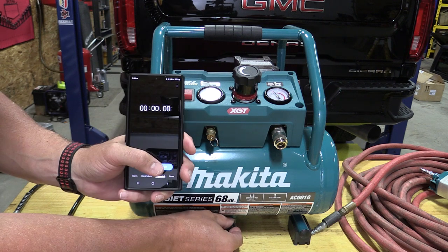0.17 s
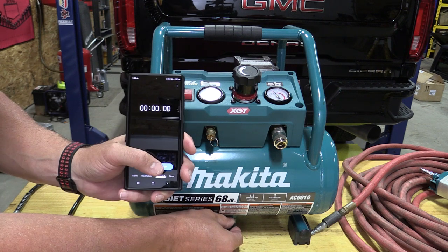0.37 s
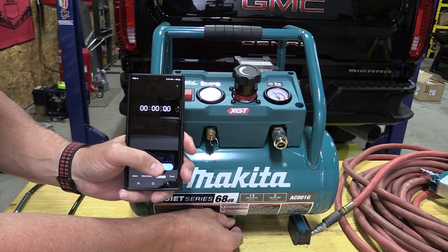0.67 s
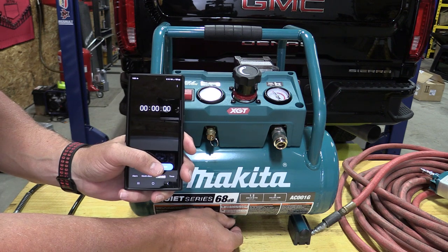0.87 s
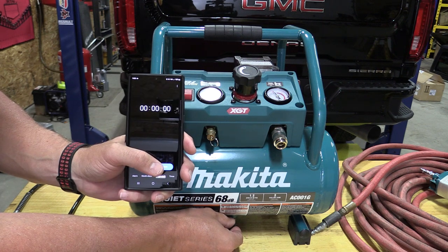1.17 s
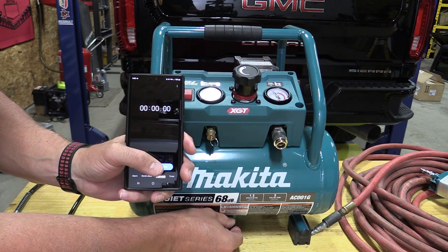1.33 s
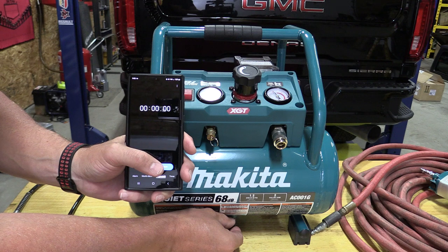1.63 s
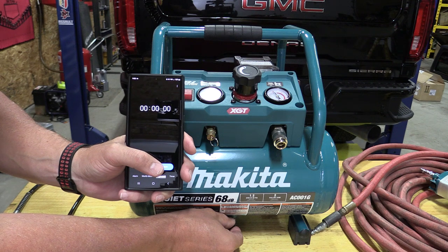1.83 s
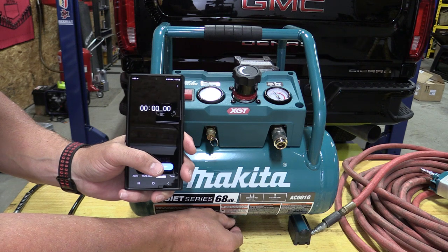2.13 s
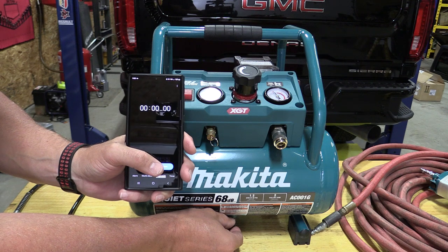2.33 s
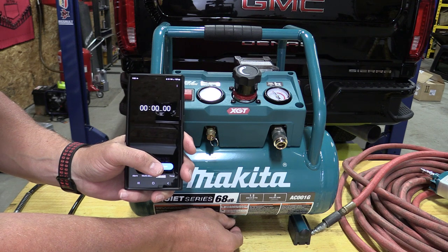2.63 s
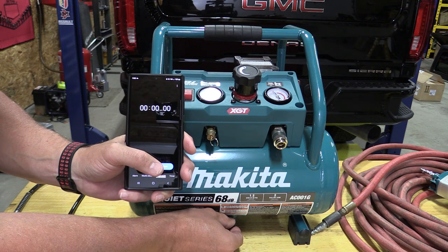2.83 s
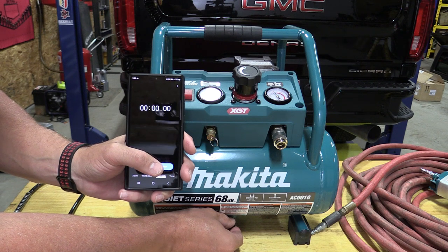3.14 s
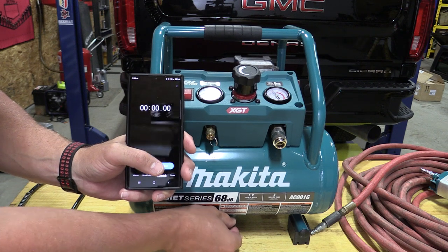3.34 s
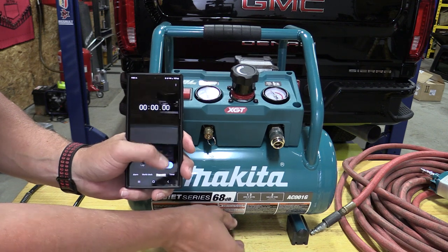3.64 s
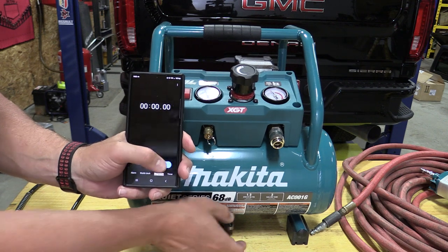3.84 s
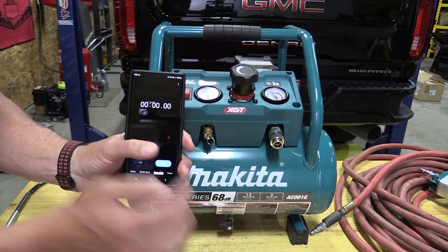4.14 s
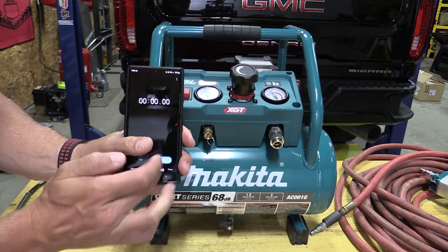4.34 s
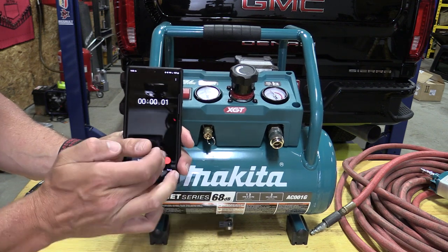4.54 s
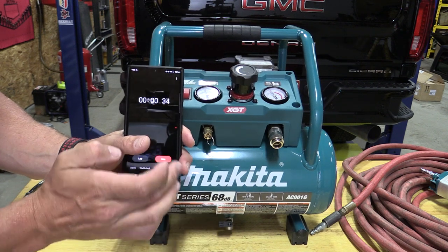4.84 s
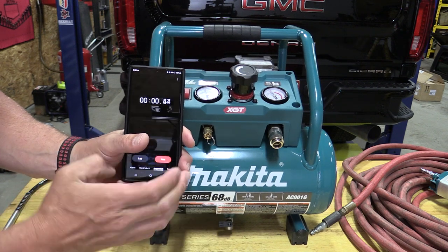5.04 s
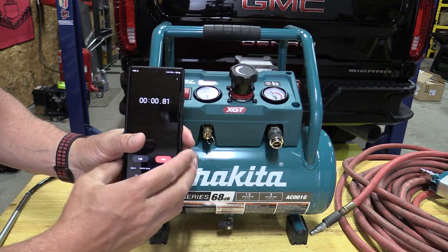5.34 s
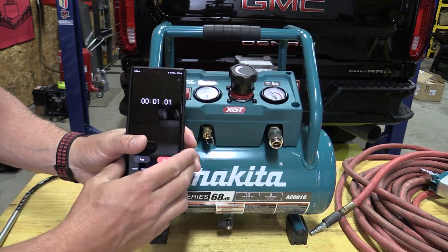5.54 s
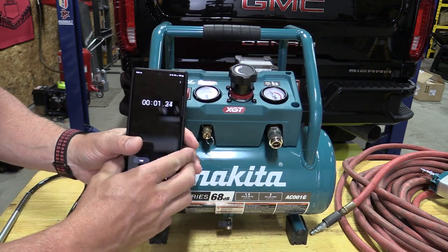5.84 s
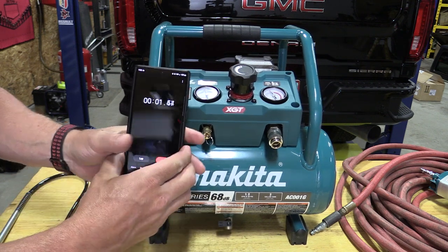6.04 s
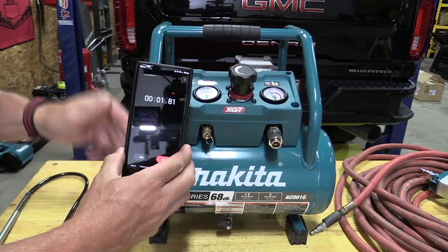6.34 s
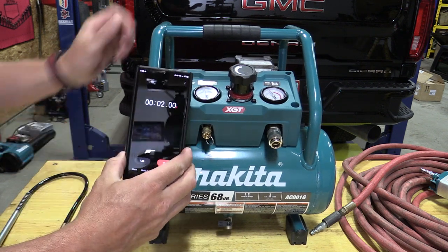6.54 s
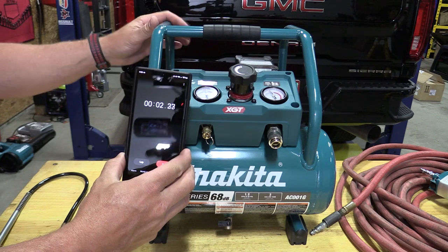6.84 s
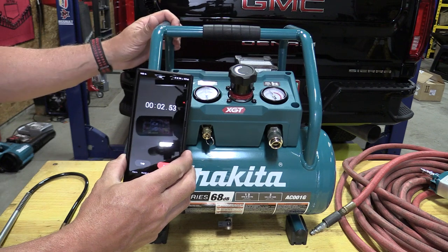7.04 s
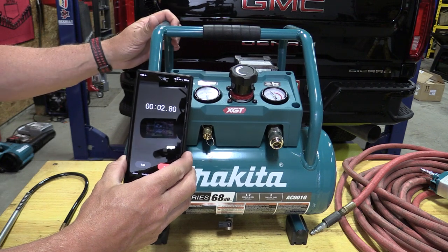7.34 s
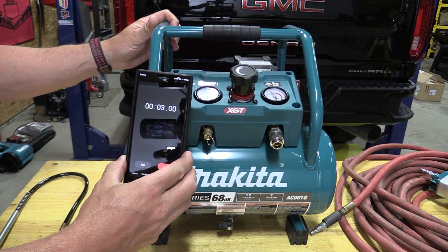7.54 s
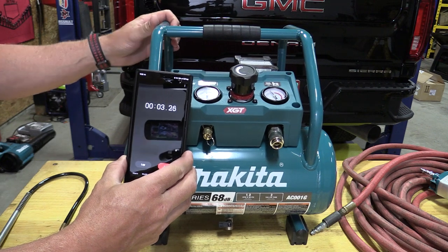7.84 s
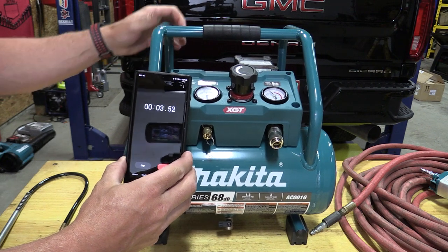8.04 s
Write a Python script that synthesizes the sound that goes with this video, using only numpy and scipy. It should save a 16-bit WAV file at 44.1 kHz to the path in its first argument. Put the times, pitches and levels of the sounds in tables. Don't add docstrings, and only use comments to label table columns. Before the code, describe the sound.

A tank drain cock is opened almost at once and sprays bright, flickering air for about three seconds, with sparse metallic ticks from its lever. The motor jerks in with dull knocks, the hiss is shut off abruptly, and a small pump runs on with a steady buzzing whine, rattling covers and rapid valve clicks. Close microphone, hard-walled workshop with bright short echoes.

```python
import sys
import numpy as np
from scipy import signal
from scipy.io import wavfile
from scipy.ndimage import uniform_filter1d

SR = 44100
rng = np.random.default_rng(int(sys.argv[2]) if len(sys.argv) > 2 else 0)


def wrap_up_sound(samples):
    columns = np.atleast_2d(samples).T
    tamed = np.clip(columns, -1, 1)
    steps = np.round(tamed * 32767).astype(np.int16)
    wavfile.write(sys.argv[1], SR, steps)


def field_ratio(decibels):
    return 10 ** (np.asarray(decibels, dtype=float) / 20)


N = 361619
SLOW = np.arange(0, N / SR + .02, .01)
POLES = 28
STARTS_S = 3.19


def evened(x):
    return x / np.sqrt(np.mean(x ** 2) + 1e-20)


def read(points, hz):
    f, value = np.transpose(points)
    return np.interp(np.log(hz + 1), np.log(f + 1), value)


def add(mix, s, sound):
    part = mix[round(s * SR):][:len(sound)]
    part += sound[:len(part)]


def spectra_grid(size):
    return np.fft.rfftfreq(size, 1 / SR)[:, None], np.arange(4 * N // size + 5) * size / 4 / SR


def noise(gain, size):
    a, b = rng.standard_normal((gain.shape[1], gain.shape[0], 2)).T
    return signal.istft((a + 1j * b) * gain, nperseg=size, noverlap=size * 3 // 4)[1][:N]


def colour(x, points):
    log_gain = np.log(field_ratio(read(points, abs(np.fft.fftfreq(8192, 1 / SR)))))
    taps = np.fft.ifft(np.exp(signal.hilbert(log_gain).conj())).real[:2048]
    return signal.oaconvolve(x, taps)[:N]


def drift(rate, count=20):
    return evened(sum(np.sin(2 * np.pi * (f * SLOW + rng.random())) for f in rate * np.geomspace(.1, 1, count)))


def ramp(t, start, end):
    return np.clip((t - start) / (end - start), 0, 1)


def hold(t, start, full, easing, end):
    return ramp(t, start, full) - ramp(t, easing, end)


# (frequency [Hz], level [dB per Hz])
ROOM_TONE = [(8.8, -32), (15, 0), (40, 4), (50, 0), (65, -4.5), (107, -10), (173, -15), (400, -18),
             (520, -23), (880, -120)]


def room_tone():
    hz, t = spectra_grid(size=4096)
    return field_ratio(-53) * evened(noise(field_ratio(read(ROOM_TONE, hz)) * np.ones(len(t)), size=4096))


def cock_state(t):
    opens_s, open_rise_s, settle_s = .085, .01, .25
    pinch_s, shuts_s, shut_fall_s = 3.2, 3.372, .006
    leak_db, flow_db, burst_db, pinch_db, shut_db = -30, -23.5, 1.3, -1.8, -48
    leak_opening, flow_opening, pinch_opening = .07, .92, .72
    opened, pinched = ramp(t, opens_s, opens_s + open_rise_s), ramp(t, pinch_s, shuts_s)
    fresh = np.exp(-np.maximum(t - opens_s, 0) / settle_s)
    db = leak_db + opened * (flow_db + burst_db * fresh - leak_db) + pinch_db * pinched ** 2
    db = db + shut_db * ramp(t, shuts_s, shuts_s + shut_fall_s)
    wide = flow_opening + (1 - flow_opening) * fresh + pinched * (pinch_opening - flow_opening)
    return db, leak_opening + opened * (wide - leak_opening)


# (frequency [Hz], level [dB per Hz])
JET_OPEN = [(88, -56), (150, -23.5), (327, -19.5), (802, -13), (1280, -21.5), (2390, -17), (3970, -7),
            (5630, -14.5), (8320, 1.5), (10700, -3), (12800, -17), (13600, 4.5), (14170, -9), (14700, 0),
            (15800, -9.5)]
# (frequency [Hz], level [dB per Hz])
JET_NARROW = [(290, -77), (500, -45), (578, -8), (728, -20), (1020, -11.5), (1680, -9), (1840, -10),
              (2120, -13.5), (3090, -18), (4070, -7.5), (6100, -12.5), (7570, -1), (9300, -2), (10000, -10),
              (11000, -1), (12400, -5), (13300, -22), (14800, -11), (15800, -20)]
# (frequency [Hz], width [Hz], level [dB])
GAP = [(1966, 310, -17), (2544, 110, -23), (3294, 270, -10), (3720, 520, -8), (3990, 370, -9.5),
       (4720, 430, -8.5), (5180, 400, -11.5), (6460, 170, -10), (7050, 210, -10.5), (7280, 100, 1.5),
       (7800, 170, 0), (8330, 180, -5.5), (8310, 190, 1), (9000, 120, -23), (9290, 120, -22),
       (9790, 200, 4), (10330, 230, 1), (10980, 310, 1), (11700, 360, -6.5), (12200, 260, -9),
       (12750, 150, -13), (13400, 220, 1), (13850, 320, 0), (14550, 350, -9), (15000, 250, -12),
       (15400, 200, -9)]


def jet():
    hz, t = spectra_grid(size=512)
    opening = np.clip(cock_state(t)[1], 0, 1)
    humps = sum(field_ratio(2 * db) / (1 + (2 * (hz - f) / w) ** 4) for f, w, db in GAP)
    wide = np.sqrt(humps + field_ratio(2 * (read(JET_OPEN, hz) - 4.5)))
    narrow = field_ratio(read(JET_NARROW, hz))
    patches = rng.standard_normal((len(t), len(hz))).T
    patches = evened(uniform_filter1d(uniform_filter1d(patches, 9, 0), 7, 1))
    flicker_db = 1.0 * patches + 0.35 * rng.standard_normal(len(t))
    shape = opening * evened(wide) + (1 - opening) * evened(narrow)
    air = noise(shape * field_ratio(flicker_db), size=512)
    return field_ratio(cock_state(np.arange(N) / SR)[0]) * evened(air)


# (frequency [Hz], t60 [s])
WALLS = [(100, .6), (1000, 0.82), (4000, 0.76), (8000, 0.95), (11000, 0.47), (15000, 0.31)]


def workshop_echo(x):
    taps = np.zeros(SR // 2)
    at = np.arange(300, len(taps) - 20, 20)
    taps[at + rng.integers(0, 20, len(at))] = rng.choice([-1., 1.], len(at))
    hz, t, z = signal.stft(taps, SR, nperseg=256)
    decay = field_ratio(-60 * t / read(WALLS, hz)[:, None])
    tail = signal.istft(z * decay, SR, nperseg=256)[1]
    return signal.oaconvolve(x, tail / np.linalg.norm(tail))[:N]


# (time [s], crack [dB], ring [Hz], ring level [dB], ring t60 [s])
TICKS = [(1.544, -8.5, 1610, -25, .031), (1.607, -10, 594, -20.5, 0.015), (1.798, -6.5, 1636, -21, 0.066),
         (1.804, -8, 1610, -21.5, 0.13), (1.809, -11, 1780, -25, 0.053), (1.814, -9, 2900, -34, .028),
         (2.673, -17, 694, -32, 0.015), (2.859, -12, 954, -27.5, .04), (2.862, -12.5, 3140, -16.5, 0.045),
         (2.95, -18, 3600, -29, .03)]
# (frequency [Hz], level [dB per Hz])
CRACK = [(100, -48), (400, -10), (800, -4.5), (1500, -8), (2700, -6), (4000, 1), (6000, -8.5), (9000, 6.5),
         (15000, -13)]


def ticks():
    cracks, rings, t = np.zeros(N), np.zeros(N), np.arange(6000) / SR
    for s, db, hz, ring_db, t60 in TICKS:
        crack = rng.standard_normal(len(t)) * field_ratio(db - 6 - 60 * t / .035)
        top_hz = min(9.7 * hz, 14000, .45 * SR)
        add(cracks, s, signal.lfilter(*signal.butter(2, top_hz, fs=SR), crack))
        for near, quick in [(1, 1), (.95, .3), (1.06, .25)]:
            ring = field_ratio(ring_db - 5 - 60 * t / (t60 * quick)) * np.sin(2 * np.pi * hz * near * t)
            add(rings, s, ring * np.minimum(t / 0.0011, 1))
    return colour(cracks, CRACK) + rings


# (time [s], level [dB])
KICKS = [
    (3.172, -20),
    (3.198, -22),
    (3.21, -19),
]
# (frequency [Hz], level [dB], t60 [s])
FRAME = [(250, -9, 0.05), (370, -5, 0.055), (526, -15, 0.045), (722, -0.5, 0.044), (798, 1, 0.064),
         (953, -5.5, 0.086), (1110, -6, 0.044)]


def kicks():
    out, t = np.zeros(N), np.arange(6000) / SR
    for s, db in KICKS:
        ring = np.zeros(len(t))
        for hz, mode_db, t60 in FRAME:
            pitch = hz * rng.uniform(.94, 1.06)
            ring += field_ratio(mode_db - 60 * t / min(t60, .09)) * np.sin(2 * np.pi * pitch * t)
        add(out, s, field_ratio(db) * ring * np.minimum(t / 0.0022, 1))
    return out


# (time [s], pole whine [Hz])
SPEED = [(3.2, 934.2), (4.6, 926.9), (5.4, 924.7), (6.4, 920.2), (7.5, 919.2), (8.2, 916.6)]


def shaft_turns(t):
    known_s, known_turns = 3.6, 13.6
    turns = np.cumsum(np.interp(t, *np.transpose(SPEED))) / POLES / SR
    return turns - turns[round(known_s * SR)] + known_turns


def tank_load(t):
    return ramp(t, 3.7, 5.65)


def hand_grip(t):
    return hold(t, 6.95, 7.28, 7.9, 8.33)


# (shaft order, level [dB])
FREE = [(1, -16.5), (2, -10), (3, -9), (4, -3), (5, -8.5), (6, -12), (7, -9.5), (8, -9.5), (9, -11),
        (10, -8), (11, -15), (12, -5), (13, -6), (14, -1.5), (15, -4), (16, -42.5), (17, -7), (18, -20),
        (19, -6.5), (20, -38), (21, -28), (22, -10), (23, -12), (24, -3.5), (25, -6), (26, -4.5),
        (27, -2.5), (28, 3),
        (29, -27), (30, -14.5), (31, -24.5), (32, -7), (33, -10), (34, -8), (35, -10.5), (36, -17.5),
         (37, -24.5), (38, -11.5), (40, -16), (41, -17), (42, -17)]
# (shaft order, change [dB])
LIGHT_SHIFT = [(4, 1.5), (6, -2), (8, 3), (11, 6), (14, -3.5), (15, -3.5), (16, 5), (20, 30), (21, 22),
               (24, -7), (25, 5), (26, 3), (31, -23), (33, 2)]
# (shaft order, change [dB])
HELD_SHIFT = [(2, -18), (4, 2), (7, 2.5), (11, 8), (13, 5), (14, -5), (16, 20), (17, -5), (19, -16),
              (23, 4), (24, -7), (27, 5), (30, 10), (31, -8)]
BLOWS = [(1, 0, -1, .1), (4, 0, 1, .3), (7, .605, 1, .15), (13, .72, 1, .9), (17, .13, 1, .9),
         (24, .78, 1, 1.3), (29, .63, 1, 1.6)]


def shaft_orders(turns):
    out, t = np.zeros(N), np.arange(N) / SR
    load, grip = tank_load(SLOW), hand_grip(SLOW)
    for order, free_db in FREE:
        _, at, sign, scatter = [blow for blow in BLOWS if blow[0] <= order][-1]
        upper_db = -4 * (order > POLES)
        light_db = dict(LIGHT_SHIFT).get(order, 0) + upper_db
        held_db = dict(HELD_SHIFT).get(order, 0) + upper_db
        waver = .03 * order ** .5 * (order != POLES) + .03
        db = free_db + (1 - load) * light_db + grip * held_db + 1.5 * waver * drift(5.0, count=8)
        db = db - 32.5
        if order == POLES:
            db = db - 0.44 * load + 0.9 * grip - 3.5 * (1 - ramp(SLOW, 3.55, 3.9))
            db = db + .5 * drift(1.48, count=8)
        slip = rng.normal(0, scatter) + waver * drift(4.0, count=8)
        phase = 2 * np.pi * order * (turns - at) + np.interp(t, SLOW, slip)
        out += sign * np.interp(t, SLOW, field_ratio(db)) * np.cos(phase)
    return np.sqrt(2) * out


# (frequency [Hz], level [dB per Hz])
COVERS = [(30, -72), (200, -12.5), (300, -9), (380, 1.5), (480, 2), (600, 3.5), (700, 1.5), (800, -2.5),
          (950, -6), (1100, -4.5), (1300, -17), (1800, -16.5), (2300, -30), (4000, -71)]


def covers(turns, rattle_db):
    often = 1 + .5 * np.cos(2 * np.pi * 4 * (turns - .6)) + .45 * np.cos(2 * np.pi * 2 * (turns - .62))
    struck = rng.random(N) < 2500 * often / SR
    knocks = struck * field_ratio(2.2 * np.minimum(rng.exponential(1, N), 4))
    knocks *= rng.choice([-1., 1.], N)
    scrape = .5 * rng.standard_normal(N)
    return field_ratio(rattle_db) * evened(colour(evened(knocks) + scrape, COVERS))


# (frequency [Hz], level [dB per Hz])
AIRWAY = [(710, -26), (1200, -5), (1520, -9.5), (1950, -2.5), (2150, -23), (2610, -12), (2880, -16.5),
          (3810, -15), (5930, -25.5), (6460, -25.5), (8370, -22.5), (9950, -25), (12200, -29.5),
          (14500, -29.5), (15800, -33)]
# (crank angle [turns], length [turns], gain [dB], centre [Hz], width [octaves])
PUFFS = [(.6, .05, 7, 2800, .6), (.06, .07, 3.5, 4000, .9), (.58, .03, 4, 4500, .5),
         (.36, .12, -2.5, 4000, .8), (.5, .03, 8, 14000, .4), (.3, .03, 3, 10000, .5),
         (.8, .12, 4, 13500, .4), (.57, .04, 5, 6200, .35), (.64, .04, 4, 1500, .8),
         (.27, .17, -6, 6300, .2), (.24, .2, -5, 14800, .25)]


def airway(turns, running, depth):
    hz, t = spectra_grid(size=128)
    angle = np.interp(t * SR, np.arange(N), turns)
    depth = np.interp(t * SR, np.arange(N), depth)
    db = read(AIRWAY, hz) + 0.32 * rng.standard_normal(len(t))
    for at, length, gain_db, centre_hz, octaves in PUFFS:
        near = (angle - at + .5) % 1 - .5
        away = np.log2((hz + 1) / centre_hz) / octaves
        db = db + depth * gain_db * np.exp(-(near / length) ** 2 - away ** 2)
    return field_ratio(-42 + 2.5) * running * evened(noise(field_ratio(db), size=128))


# (frequency [Hz], peak [dB], t60 [s], crank angle [turns])
REEDS_FIRST = [(6250, -40, .014, .53), (6680, -46, .025, .58), (6780, -42, .03, .76),
               (10400, -41, .014, .5), (14600, -52, .025, .74), (13950, -53, .02, .52),
               (1970, -42, .05, .64)]
# (frequency [Hz], peak [dB], t60 [s], crank angle [turns])
REEDS_SECOND = [(9760, -43, .03, .84), (8930, -49, .03, .32), (1650, -38, .03, .63), (1900, -40, .04, .1),
                (2930, -39, .015, .58), (5700, -44, .012, .56), (11000, -50, .03, .84),
                (13900, -50, .009, .5), (14700, -51, .008, .51), (11750, -51, .025, .14),
                (10050, -47, .012, .31), (12950, -53, .025, .74)]


def reeds(turns, modes, ring_db):
    out, t = np.zeros(N), np.arange(1500) / SR
    for hz, db, t60, at in modes:
        passes = np.diff(np.floor(turns - at), prepend=-1.) > 0
        where = np.flatnonzero(passes & (turns > 1))
        for i, (size, detune) in zip(where, rng.standard_normal((len(where), 2))):
            pitch = hz * (1 + .018 * detune * min(.015 / t60, 1))
            decay = field_ratio(db + ring_db[i] + 0.96 * size - 60 * t / t60)
            add(out, i / SR, decay * np.sin(2 * np.pi * pitch * t) * np.minimum(t / 0.00045, 1))
    return out


# (time [s], length [s], pitch [Hz], level [dB])
SQUEAKS = [(3.776, .008, 7400, -48), (3.801, .012, 7500, -42), (3.835, .008, 7500, -46),
           (5.26, .02, 7670, -52), (5.288, .03, 7670, -49), (5.404, .03, 7680, -48),
           (5.442, .025, 7680, -50), (5.527, .025, 7690, -51), (5.605, .03, 7680, -55),
           (5.68, .045, 7690, -53)]


def squeaks():
    out = np.zeros(N)
    for s, length, hz, db in SQUEAKS:
        t = np.arange(0, length, 1 / SR)
        glide = np.cumsum(hz * (1 + .03 * np.exp(-t / .003))) / SR
        add(out, s, field_ratio(db) * np.sin(2 * np.pi * glide) * signal.windows.tukey(len(t), .6))
    return out


def compressor():
    t = np.arange(N) / SR
    load, grip, turns = tank_load(t), hand_grip(t), shaft_turns(t)
    running = ramp(t, STARTS_S, STARTS_S + 0.029)
    rattle_db = -28.5 + 0.2 * grip - 9 * (1 - running)
    body = running * (shaft_orders(turns) + covers(turns, rattle_db)) + kicks()

    early = turns + np.interp(t, [STARTS_S, N / SR], [.02, .065])
    cold_db = -15 * (1 - ramp(t, STARTS_S, STARTS_S + .11))
    chatter = hold(t, 6.1, 6.55, 7.92, 8.15)
    first_db = -7 + 6.5 * chatter + cold_db
    second_db = -4.5 + 4.5 * np.sqrt(load) - 4.5 * np.sqrt(grip) + cold_db
    valves = reeds(early, REEDS_FIRST, first_db) + reeds(early, REEDS_SECOND, second_db)
    puff_depth = 0.7 + 0.23 * load - 0.21 * grip
    return body, airway(early, running, puff_depth) + valves + squeaks()


def scene():
    cock = jet() + ticks()
    body, air = compressor()
    echo = workshop_echo(field_ratio(-12.5) * cock + field_ratio(-7) * air)
    mono = cock + body + air + echo + room_tone()
    return np.array([mono, mono])


def top_cut(x):
    return signal.sosfilt(signal.butter(12, 15980, fs=SR, output="sos"), x)


def record(dry):
    low_pass = signal.firwin(1023, 15760, window=("kaiser", 9), fs=SR)
    limited = signal.oaconvolve(dry, low_pass[None], "same")
    return top_cut(limited)


dry = scene()
out = record(dry)
wrap_up_sound(out)
```